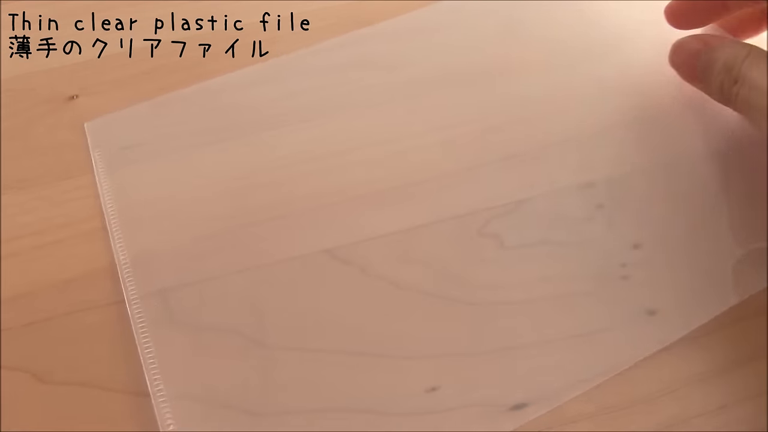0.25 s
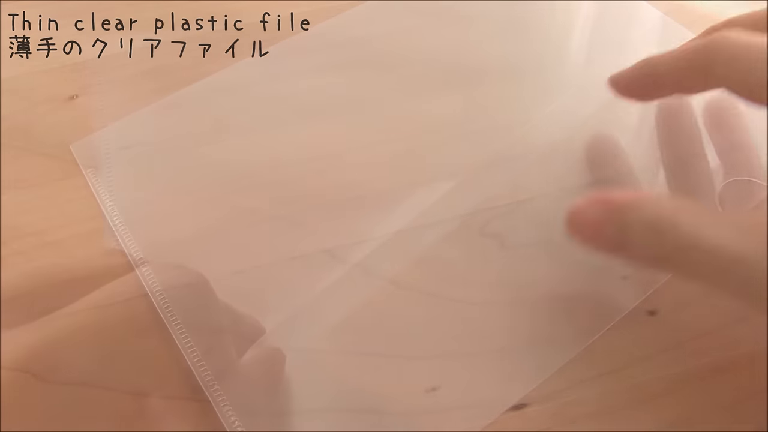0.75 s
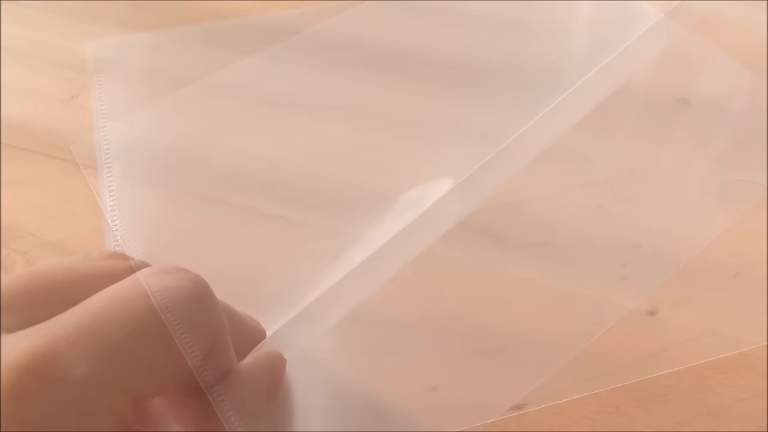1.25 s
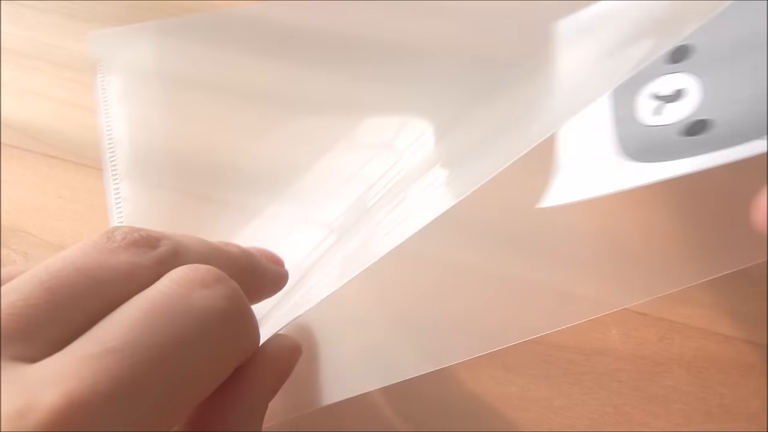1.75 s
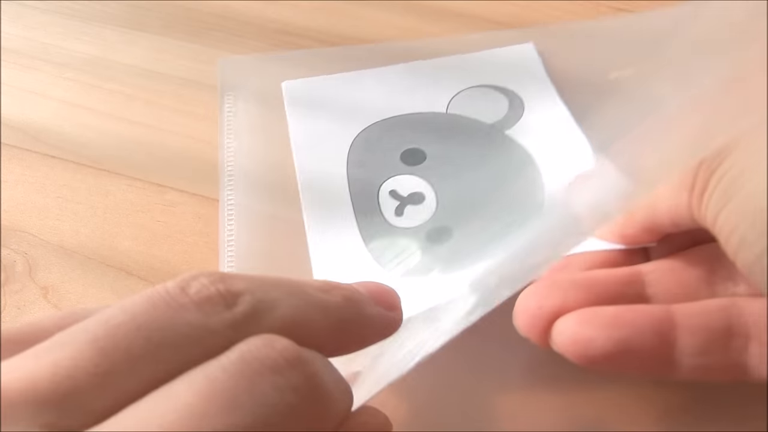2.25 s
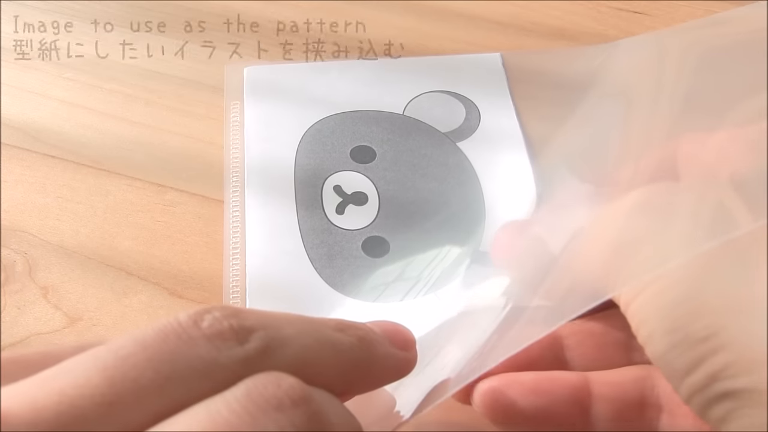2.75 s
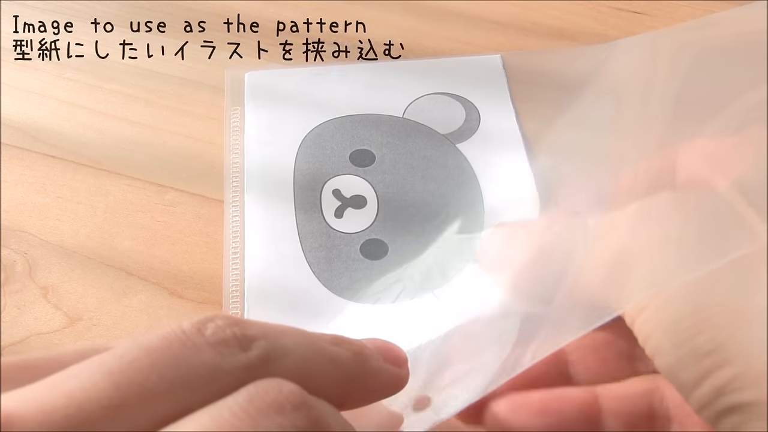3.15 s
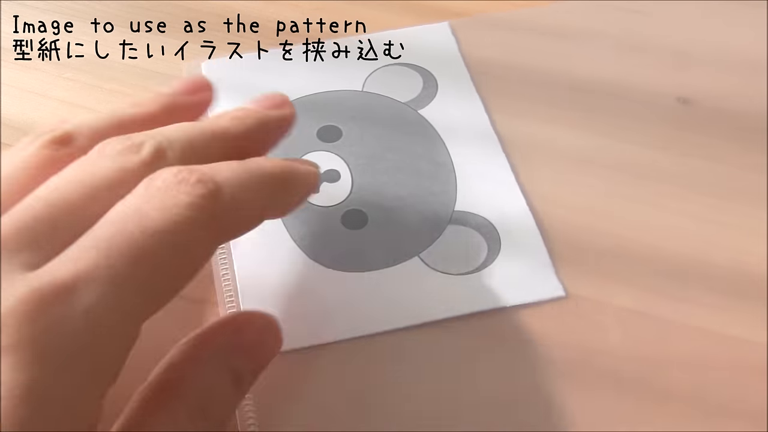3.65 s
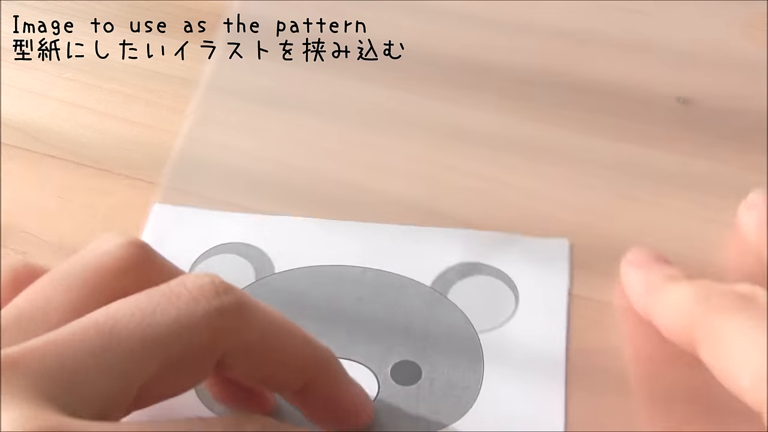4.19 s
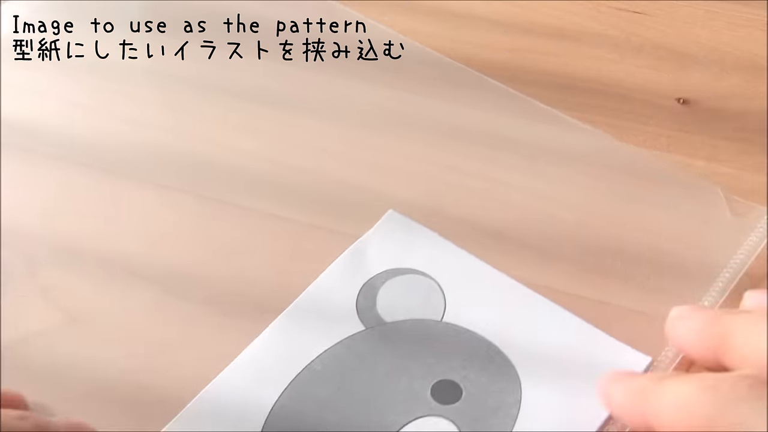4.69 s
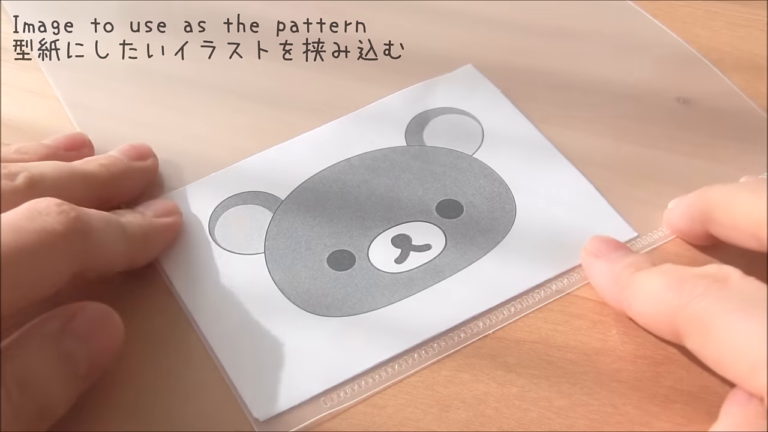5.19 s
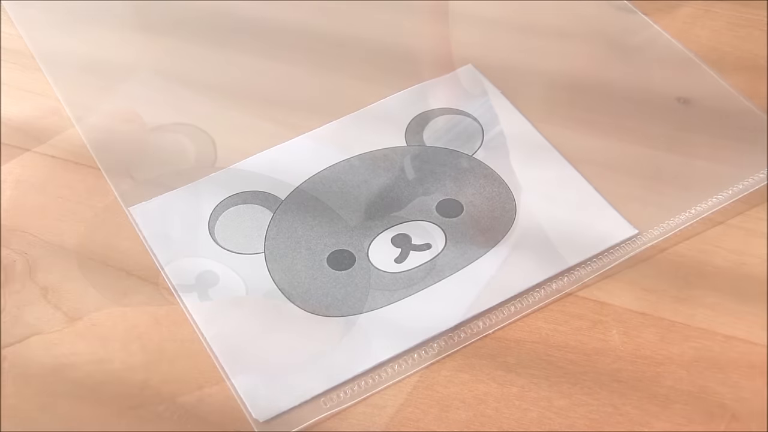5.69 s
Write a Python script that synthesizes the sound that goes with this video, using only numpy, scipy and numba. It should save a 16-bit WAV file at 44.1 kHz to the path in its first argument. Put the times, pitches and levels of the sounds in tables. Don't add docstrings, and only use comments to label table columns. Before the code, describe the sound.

Close, dry stereo sound in a small quiet room, with soft air noise and low handling rumble whose level steps between scenes. In the first 0.1 s thin plastic crackles in quick ticks and small flexes; a faint touch comes at 0.5 and sharp dry ticks at 0.6 and 0.73. Then near quiet, with a small tick at 1.45. From about 1.75 a paper sheet slides in: gritty bright hiss with a ringing, airy colour, a rapid stuttering chatter at 1.92-1.99, and a stronger push near 2.05. At 2.33 the film buckles in a hard snap with a table knock, another at 2.41; weaker sliding follows to 2.9. The loudest double snap comes at 3.24-3.26, with crackle dying away. At 3.53 the cover drops with a small pop and hollow airy ring. From 3.9 to 5.3 the folder turns with softer hissing rubs, a dull knock at 4.21, and fine ticks, fading into faint handling.

```python
import sys
import numpy as np
from scipy import signal
from scipy.io import wavfile
from scipy.ndimage import uniform_filter1d
from numba import njit

SR = 44100
rng = np.random.default_rng(int(sys.argv[2]) if len(sys.argv) > 2 else 0)


def undo_db(level):
    steps = np.asarray(level, float) / 20
    return 10 ** steps


def file_out(sig):
    cols = np.atleast_2d(sig).T
    lim = np.clip(cols, -1, 1)
    pcm = np.round(lim * 32767).astype(np.int16)
    wavfile.write(sys.argv[1], SR, pcm)


N = 261503
EDGES_HZ = 22 * 2 ** np.arange(0, 9.6, .5)
SNAP_PAN_DB = -3
# (time [s], peak level [dB])
CATCHES = [
    (1.921, -38),
    (1.928, -25.5),
    (1.9485, -22),
    (1.960, -31),
    (1.978, -24),
    (1.9823, -29),
    (1.987, -35),
]
CATCH_PAN_DB = -5


def rms_one(x):
    return x / np.sqrt(np.mean(x ** 2) + 1e-20)


def in_time(tables):
    rows = np.concatenate(tables)
    s, *columns = rows[np.argsort(rows[:, 0])].T
    return [np.interp(np.arange(N) / SR, s, c) for c in columns]


def at_hz(points, hz):
    points = np.array(points)
    return np.interp(np.log(hz), np.log(points[:, 0]), points[:, 1])


def by_take(rows):
    s, *columns = np.transpose(rows)
    take = np.searchsorted(s, np.arange(N) / SR, side="right") - 1
    return [uniform_filter1d(c[np.maximum(take, 0)], size=SR // 40) for c in columns]


def strokes(rows):
    s, rise, hold, fall, db = np.abs(np.transpose(rows))[:, :, None]
    t = np.arange(0, N + 32, 32) / SR
    before = np.maximum(s - t, 0) / (rise + 1e-3)
    after = np.maximum(t - s - hold, 0) / (fall + 1e-3)
    power = np.sum(undo_db(-db - 20 * (before + after)) ** 2, axis=0)
    return np.interp(np.arange(N) / SR, t, power)


def band(x, low_hz, high_hz):
    return signal.sosfilt(signal.butter(2, [low_hz, high_hz], "band", fs=SR, output="sos"), x)


def drift(rate):
    r = np.exp(-80 * np.pi * rate / SR)
    slow = signal.lfilter([1], [1, -2 * r, r * r], rng.standard_normal(N // 40 + 2002))[2000:]
    return np.interp(np.arange(N) / 40, np.arange(len(slow)), rms_one(slow))


def grit(per_s, spread_db, alike):
    sizes = undo_db(spread_db * np.minimum(rng.exponential(1, (2, N)), 5)) * rng.standard_normal((2, N))
    mid, side = sizes * (rng.random((2, N)) < per_s / SR)
    alike = np.clip(alike, 0, 1)
    return np.sqrt(1 + alike) * mid + np.sqrt(1 - alike) * side * [[1], [-1]]


def colour(sources, spectrum, patchy_db, rate):
    out = 0
    for k, (low, high) in enumerate(zip(EDGES_HZ, EDGES_HZ[1:])):
        hz = np.sqrt(low * high)
        if spectrum[0][0] <= hz <= spectrum[-1][0]:
            gain = undo_db(at_hz(spectrum, hz) + patchy_db * drift(rate))
            out = out + gain * band(sources[k % 2], low, high)
    return rms_one(out)


def add(out, s, sound, pan_db):
    i = round(s * SR)
    sound = sound[..., :N - i]
    out[:, i:i + sound.shape[-1]] += sound * undo_db([[pan_db / 2], [-pan_db / 2]])


def burst(hz, t60, rise_s, phase):
    t = np.arange(SR // 4) / SR
    swell = 1 - np.exp(-(t / rise_s) ** 2)
    return swell * undo_db(-60 * t / t60) * np.sin(2 * np.pi * hz * t + phase)


def swing(hz, length_s, phase):
    t = np.arange(SR // 4) / SR
    swell = 1 - np.exp(-(t / (.12 * length_s)) ** 2)
    return swell * undo_db(-60 * (t / length_s) ** 1.6) * np.sin(2 * np.pi * hz * t + phase)


@njit
def moving_ring(x, hz, width_hz, sr):
    y = np.zeros_like(x)
    r = np.exp(-np.pi * width_hz / sr)
    for c in range(x.shape[0]):
        for i in range(2, x.shape[1]):
            feedback = 2 * r * np.cos(2 * np.pi * hz[i] / sr) * y[c, i - 1] - r * r * y[c, i - 2]
            y[c, i] = x[c, i] - x[c, i - 2] + feedback
    return y


def room_tone():
    # (start [s], room tone [dB], handling rumble [dB])
    take_levels = [(0, -57, -64), (.13, -65, -72), (.48, -59.5, -69.5), (1.85, -60, -66.5),
                   (2.6, -61, -71.5), (3.37, -64, -70), (3.58, -69, -77.5), (4.3, -66.5, -74.5),
                   (5.665, -59.5, -69)]
    # (frequency [Hz], density [dB per Hz])
    air_spectrum = [(88, -54), (150, -18), (213, -2.5), (291, -6), (587, -8), (647, -10.5), (2170, -14),
                    (3960, -19.5), (13500, -33), (15800, -32)]
    # (frequency [Hz], density [dB per Hz])
    rumble_spectrum = [(22, -21), (50, -8.5), (80, -18.5), (110, -0.5), (150, -7), (220, -32)]
    tone_db, rumble_db = by_take(take_levels)
    mid, side = rng.standard_normal((2, 2, N))
    wide = [m + s * [[.65], [-.65]] for m, s in zip(mid, side)]
    close = [m + s * [[.36], [-.36]] for m, s in zip(side, mid)]
    air = colour(wide, air_spectrum, patchy_db=1.34, rate=20) * undo_db(tone_db + 5.0)
    rumble = colour(close, rumble_spectrum, patchy_db=4.5, rate=6.0) * undo_db(rumble_db + 1.3)
    return air + rumble


def echoes(x):
    # (frequency [Hz], t60 [s])
    echo_t60 = [(200, 0.27), (1000, 0.3), (3000, 0.36), (10000, 0.12)]
    # (frequency [Hz], level [dB])
    echo_level = [(200, 5.5), (1000, -2), (3000, -8.5), (10000, 5)]
    t, tail = np.arange(SR // 2) / SR, 0
    shared, own = rng.standard_normal(len(t)), rng.standard_normal((2, len(t)))
    for low, high in zip(EDGES_HZ[5::2], EDGES_HZ[7::2]):
        hz = np.sqrt(low * high)
        decay = undo_db(at_hz(echo_level, hz) - 60 * t / at_hz(echo_t60, hz))
        tail = tail + band(0.76 * shared + own, low, high) * decay
    tail = tail * np.clip(t / 0.001, 0, 1)
    return signal.fftconvolve(x.mean(axis=0)[None], tail, axes=1)[:, :N]


def settle():
    # (frequency [Hz], level [dB], t60 [s])
    pocket_modes = [(775, -14, .3), (960, -7, 0.43), (1034, -2, .14), (1470, -6.5, .18)]
    # (time [s], level [dB])
    touches = [
        (3.538, -42.5),
        (.5, -54),
    ]
    out, t = np.zeros((2, N)), np.arange(SR // 2) / SR
    for s, db in touches:
        for hz, level_db, t60 in pocket_modes:
            ring = rms_one(band(rng.standard_normal(len(t)), .955 * hz, 1.045 * hz))
            add(out, s, undo_db(db + level_db - 60 * t / t60) * ring, -3.0)
    return out


def knocks():
    # (time [s], peak level [dB], pitch best excited [Hz])
    touches = [(0.044, -46, 223), (0.227, -51, 437), (.277, -54, 437), (0.491, -48.5, 463),
               (0.756, -43, 225), (1.599, -61, 135), (2.068, -51, 270), (2.337, -25, 410),
               (2.345, -37, 355), (2.385, -38, 260), (3.256, -40, 302), (3.475, -53, 132),
               (4.001, -48, 236), (4.212, -35.5, 223), (4.569, -61, 234), (5.058, -60, 124)]
    # (frequency [Hz], level [dB], t60 [s])
    table_modes = [(100, -7, 0.16), (135, -2.5, 0.25), (187.4, -5.5, 0.22), (223, -2.5, 0.18),
                   (260, -4.5, .14), (317.5, -7.5, 0.17), (352, -4, 0.1), (567, -12.5, 0.17),
                   (770, -8, .12), (990, 1.5, 0.071)]
    out = np.zeros((2, N))
    for (s, db, best_hz), phases in zip(touches, rng.random((len(touches), len(table_modes)))):
        ring = 0
        for (hz, level_db, t60), p in zip(table_modes, phases):
            octaves = np.log2(hz / best_hz)
            gain = undo_db(level_db - 9.0 * abs(octaves) - 6.4 * max(-octaves, 0))
            ring = ring + gain * burst(hz, t60, 0.0014, 6 * p)
        add(out, s, undo_db(db) * ring / np.abs(ring).max(), -.8)
    return out


def after_crackle():
    # (time [s], level [dB], lowest [Hz], highest [Hz], t60 [s])
    crackles = [(3.238, -42, 900, 2200, .1), (3.26, -38, 1600, 3000, .3), (3.262, -40, 800, 1410, .4),
                (3.54, -52, 1050, 1800, .2), (2.334, -32, 1296, 2778, 0.044), (2.342, -34, 700, 1700, 0.12)]
    out, slips, t = np.zeros((2, N)), grit(1800, 2.0, 0.71), np.arange(SR // 2) / SR
    for s, db, low_hz, high_hz, t60 in crackles:
        i = round(s * SR)
        once = band(slips[:, i:i + len(t)], low_hz, high_hz)
        crackle = rms_one(band(once, low_hz, high_hz))
        add(out, s, undo_db(db - 60 * t / t60) * crackle, SNAP_PAN_DB)
    return out


def ticks():
    # (time [s], peak level [dB], pitch [Hz], left-right [dB])
    dry_ticks = [(0.0417, -34, 3130, 4), (0.092, -31.5, 3570, 4), (0.6178, -30.5, 5100, -8),
                 (0.655, -49, 3800, -1.5), (0.7347, -21.5, 6470, 6), (0.7431, -27.5, 5900, 2),
                 (1.8224, -37.5, 4270, -21.5), (2.2232, -30, 3140, -1), (2.27, -33, 5550, -12),
                 (2.299, -30.5, 4400, -5), (2.3244, -45, 3100, -3), (3.2417, -43, 4520, -9),
                 (3.3182, -35, 4500, -2), (3.7991, -40, 10500, 1.5), (0.7345, -32, 2600, 6),
                 (3.799, -33, 4070, 1.5), (3.817, -37, 4030, 0.5), (3.863, -38, 5540, -1.0),
                 (4.211, -41.5, 1800, 2), (4.7772, -39.5, 4400, -2), (1.736, -38, 4000, -2),
                 (1.774, -41, 4500, -2), (1.8, -41, 1400, 2), (1.82, -37, 1700, -4), (5.093, -48, 4300, -1),
                 (4.604, -42, 4300, 1), (4.658, -43, 4500, -3), (4.522, -43, 4200, 1),
                 (5.489, -42, 3840, -1.0)]
    # (time [s], peak level [dB], pitch [Hz], left-right [dB], t60 [s])
    odd_ticks = [(.0250, -25, 8000, 9, 0.0062), (0.0512, -20.5, 2500, 5, 0.0027),
                 (0.0512, -26, 8500, 2, 0.0032), (0.6063, -38.5, 7800, -6, .006),
                 (3.2359, -28, 5970, -10, .004), (0.49, -46, 1700, -1, .02),
                 (1.448, -44.5, 3000, -2, 0.014), (1.888, -35, 7000, 2, .008),
                 (4.4488, -29, 5330, 4, 0.0018), (4.9144, -26, 5100, 1, .002), (4.995, -37, 4190, -1, .003)]
    out, t = np.zeros((2, N)), np.arange(900) / SR
    rows = [(*r, 0.0065) for r in dry_ticks] + odd_ticks
    rows += [(s, db - 5.0, 2700, CATCH_PAN_DB, 0.0089) for s, db in CATCHES]
    for (s, db, hz, pan, t60), white in zip(rows, rng.standard_normal((len(rows), 900))):
        spray = white * undo_db(-60 * t / max(t60, .001))
        crack = band(3.4 * (t == 0) + spray, 0.55 * hz, min(1.57 * hz, 15500))
        add(out, s, undo_db(db) * crack / np.abs(crack).max(), pan)
    return out


def chatter():
    # (frequency [Hz], level [dB], t60 [s])
    edge_modes = [(1180, -3, 0.01), (2620, 0, 0.0096), (3850, 0, 0.0065)]
    out = np.zeros((2, N))
    for (s, db), u in zip(CATCHES, rng.random((len(CATCHES), 6))):
        ring = 0
        for k, (hz, level_db, t60) in enumerate(edge_modes):
            ring = ring + undo_db(level_db + 4.0 * u[k]) * swing(hz, t60, 6 * u[k + 3])
        add(out, s, undo_db(db - 9.0) * ring, CATCH_PAN_DB)
    return out


def snaps():
    # (time [s], peak level [dB], pitch [Hz], t60 [s], overtone [dB])
    main_snaps = [(0.09, -36.5, 543, 0.01, -2), (0.489, -50, 940, 0.023, 2),
                  (2.332, -14, 965, 0.0068, -6.5), (2.345, -27, 793, 0.037, 1.5),
                  (2.35, -31, 994, 0.02, -20), (2.359, -30, 940, 0.017, -11), (2.365, -30, 563, 0.018, -12),
                  (2.382, -33, 745, 0.0065, -3), (2.411, -18.5, 2390, 0.0055, -24),
                  (2.419, -32, 2170, 0.0084, -14), (2.438, -34.5, 2320, 0.013, -14),
                  (3.235, -6.5, 1496, 0.0059, -2.5), (3.2574, -9, 1420, 0.0041, -18)]
    # (time [s], peak level [dB], pitch [Hz], t60 [s], left-right [dB])
    side_snaps = [(0.029, -27, 1280, 0.003, 4), (0.051, -27, 2600, 0.0046, 4),
                  (0.06, -31.5, 724, 0.0056, 3), (1.448, -40.5, 870, 0.0029, 16.5),
                  (1.736, -42, 2900, 0.0075, -6), (1.799, -45, 585, 0.029, -4),
                  (1.886, -32, 3190, 0.015, 12.5), (2.336, -19.5, 610, 0.011, -11),
                  (3.336, -29, 1200, 0.0074, -5), (3.355, -36, 810, 0.0085, -5)]
    # (time [s], peak level [dB], pitch [Hz], t60 [s], left-right [dB])
    tight_snaps = [(0.027, -39, 3500, 0.0063, 10.5), (2.2704, -41.5, 3180, 0.01, -5),
                   (2.4117, -16, 3460, 0.0039, -2.5), (3.2578, -18, 2440, .0045, -1.5),
                   (2.3375, -25.5, 2300, 0.0034, -1), (3.534, -25.5, 985, 0.0078, -7),
                   (3.536, -30.5, 1450, 0.0072, -6), (4.211, -45, 1093, 0.022, 8),
                   (0.032, -36, 1400, 0.011, 1)]
    out, t = np.zeros((2, N)), np.arange(SR // 4) / SR
    rows = [(*r, SNAP_PAN_DB) for r in main_snaps]
    rows += [(*r[:4], -5, r[4]) for r in side_snaps]
    rows += [(*r[:4], -24, r[4]) for r in tight_snaps]
    phases, noises = rng.random((len(rows), 2)), rng.standard_normal((len(rows), SR // 4))
    for (s, db, hz, t60, over_db, pan), u, white in zip(rows, phases, noises):
        t60 = max(t60, .002)
        ring = swing(hz, t60, 6 * u[0]) + undo_db(over_db) * swing(1.917 * hz, 0.6 * t60, 6 * u[1])
        crack = band(white * undo_db(-60 * t / 0.021), 0.33 * hz, 5800) * undo_db(-20)
        uneven = 2.26 * white * np.abs(white)
        small = uneven * np.clip(t / 0.002, 0, 1) * undo_db(-60 * t / 0.4)
        chase = band(small, 0.53 * hz, 1.54 * hz) * undo_db(-36.0)
        add(out, s, undo_db(db) * (ring / np.abs(ring).max() + crack + chase), pan)
    return band(out, 224, 7800)


def sliding():
    # (time at full strength [s], rise [s per 20 dB], hold [s], fall [s per 20 dB], level [dB]) fingers
    film_rubs = [(0, .01, 0.0018, 0.01, -52), (.034, -0.7, 0.019, 0, -52), (.234, 0.3, .002, 0, -64.5),
                 (.38, -0.2, .02, -0.7, -69), (.495, -0.6, .002, 0, -66.5), (.61, -1, .09, 12, -68.5),
                 (.755, -0.54, .002, 0.3, -59), (.78, -3, .07, 4.5, -74), (1.455, 0.15, .002, 3, -64.5),
                 (3.215, 0.27, 0.03, 0.03, -57.5), (3.31, 0, 0.015, -0.1, -61),
                 (3.453, 0.1, 0.063, 0.1, -59), (3.515, 0.06, 0.015, 0.008, -49.5),
                 (3.79, -0.5, .002, -4, -72), (5.5, 0.5, .002, -2, -69), (5.67, -0.1, .26, 4, -65),
                 (1.83, .55, .002, .1, -70),
        (1.87, 0.093, 0.42, 0.3, -54),
        (2.043, 0.13, .002, 0.12, -47.5),
        (2.33, 0.9, 0.24, 0.063, -49),
        (2.626, .1, 0.26, 0.33, -66.5),
        (2.747, 0.13, 0.018, .1, -63.5),
        (2.837, 0.18, .002, 0.06, -57.5),
    ]
    table_rubs = [
        (3.9, .3, 0.13, 0.44, -69),
        (4.164, 0.54, 0.041, 0.072, -58),
        (4.29, 0.16, 0.14, 0.21, -58),
        (4.55, 0.11, 0.11, 0.2, -62.5),
        (4.818, 0.045, 0.28, 0.14, -59.5),
        (4.9, 0.18, .002, 0.37, -57),
    ]
    glides = [(0, .01, .012, 0.037, -41), (.058, .01, .004, 0.0091, -48), (.234, 0.016, .002, 0.14, -52.5),
              (1.83, 0.23, .002, .1, -54.5), (1.92, 0.11, 0.065, 0.056, -37),
              (2.04, 0.048, 0.029, 0.17, -39.5), (2.32, 0.67, .002, 0.042, -48),
              (2.404, 0.064, .002, 0.022, -41), (2.54, 0.14, 0.039, 0.074, -46.5),
              (2.745, .1, 0.023, 0.093, -52.5), (2.82, 0.057, .025, .06, -50.5),
              (3.225, 0.048, .002, 0.06, -45.5), (3.475, 0.022, 0.015, 0.08, -44),
              (3.518, .03, 0.0062, 0.011, -48), (3.79, 0.16, .002, .16, -64),
              (3.89, 0.067, 0.094, 0.18, -57), (4.2, .05, .002, .055, -64), (4.3, 0.089, .05, .1, -56),
              (4.385, 0.15, .01, 0.25, -48.5), (4.5, 0.23, 0.017, 0.03, -47.5),
              (4.59, 0.026, 0.067, 0.11, -50.5), (4.818, .03, 0.1, 0.29, -46.5), (5.0, .2, .02, 0.15, -50),
              (5.095, .1, 0.0089, 0.12, -48.5)]
    bends = [(0, .01, 0.0022, .05, -39.5), (.034, 0.0092, .002, 0.044, -40),
             (.055, 0.012, 0.00066, 0.0044, -30.5), (.066, .01, .002, 0.32, -54.5),
             (.234, 0.024, .002, 0.12, -49), (.398, 0.033, .002, 0.092, -59.5),
             (.495, .01, .002, 0.097, -55), (.755, .05, .002, 0.26, -61), (1.455, 0.018, .002, 0.097, -52),
             (1.829, 0.3, 0.0026, 0.037, -49), (1.92, 0.094, 0.055, 0.053, -40.5),
             (2.04, .05, 0.025, 0.13, -41), (2.16, .1, 0.15, .1, -52.5), (2.35, 0.04, .002, 0.089, -34.5),
             (2.6, 0.11, .002, 0.036, -52), (2.62, .05, 0.37, 0.53, -59.5), (2.832, 0.21, .002, 0.079, -51),
             (3.265, 0.082, .002, .012, -42.5), (3.343, 0.16, .002, 0.1, -43),
             (3.45, 0.0069, 0.059, .04, -46.5), (3.528, 0.089, .002, 0.041, -41.5),
             (4.906, 0.33, .002, 0.5, -59), (5.67, .02, .26, .1, -65)]
    # (time [s], pitch [Hz], upper mode [ratio], upper mode level [dB])
    gap_pitch = [(0, 3200, 1.25, -4), (.75, 3720, 1.25, -1), (1.8, 3240, 1.25, 1), (1.89, 3270, 1.25, -4),
                 (1.95, 2640, 1.45, -1), (1.99, 2680, 1.45, -3), (2.06, 3250, 1.3, -3.5),
                 (2.13, 3220, 1.3, -4), (2.32, 3640, 1.25, 0), (2.5, 2930, 1.25, -1.5),
                 (2.83, 3570, 1.25, 0.5), (3.22, 3680, 1.25, 1), (3.3, 2700, 1.25, 4),
                 (3.5, 3370, 1.25, -0.5)]
    # (time [s], pitch [Hz], upper mode [ratio], upper mode level [dB])
    turn_pitch = [(3.88, 3870, 1.25, -10), (4.05, 3400, 1.25, -12), (4.3, 4500, 1.17, -2),
                  (4.36, 4280, 1.25, 0), (4.39, 4270, 1.4, 6.5), (4.41, 4400, 1.3, -6),
                  (4.47, 4000, 1.3, -11), (4.5, 3850, 1.3, -10), (4.53, 4350, 1.2, -12),
                  (4.6, 4300, 1.2, -4), (4.7, 4300, 1.2, -3), (4.82, 4350, 1.17, -3.5),
                  (4.92, 4500, 1.17, -2.5), (5.02, 4240, 1.17, -2.5), (5.2, 4200, 1.2, -15),
                  (5.93, 3400, 1.25, 6)]
    # (frequency [Hz], density [dB per Hz])
    hiss_spectrum = [(880, -11.5), (1500, -11.5), (1980, -13), (3020, -12), (5510, -6), (8250, -11),
                     (12500, -10), (15800, -31.5)]
    # (frequency [Hz], density [dB per Hz])
    flex_spectrum = [(250, -12), (500, -13.5), (900, -7.5), (1500, -7.5), (2300, -8.5), (3500, -17.5)]
    idle_db, gap_share_db, bend_share_db = -85.5, -15, -12
    handled = strokes(film_rubs) + undo_db(2 * idle_db)
    rub = handled + strokes(table_rubs)
    hiss_db = 10 * np.log10(rub)
    gap_db = 10 * np.log10(strokes(glides) + undo_db(2 * gap_share_db) * rub)
    flex_db = 10 * np.log10(strokes(bends) + undo_db(2 * bend_share_db) * handled)
    gap_hz, upper, upper_db = in_time([gap_pitch, turn_pitch])
    grip = drift(19.0)

    fine = [grit(9000, 1.2, 0.74), grit(9000, 0.39, 0.64)]
    hiss = colour(fine, hiss_spectrum, patchy_db=-0.7, rate=9.1) * undo_db(hiss_db + 3.5 + 1.32 * grip)

    gap_hz = gap_hz * undo_db(0.25 * drift(26))
    slips = moving_ring(grit(5000, 1.0, 0.91), gap_hz, 3000.0, SR)
    lower_mode = 400 * moving_ring(slips, 0.958 * gap_hz, 430.0, SR)
    upper_mode = 450 * undo_db(upper_db) * moving_ring(slips, 0.95 * upper * gap_hz, 680.0, SR)
    gap = rms_one(band(lower_mode + upper_mode, 2030, 7300)) * undo_db(gap_db - 3.0 + 0.78 * grip)

    coarse = [grit(2500, 1.55, 0.57), grit(2500, 1.7, 0.63)]
    flex = colour(coarse, flex_spectrum, patchy_db=2.5, rate=6.9) * undo_db(flex_db - 3.0 + 0.53 * grip)
    return (hiss + gap + flex) * undo_db([[-.6], [.6]])


def scene():
    hits = snaps() + ticks() + chatter() + knocks()
    reverberant = hits + undo_db(-34) * echoes(hits)
    return reverberant + settle() + after_crackle() + sliding() + room_tone()


def band_limit(x):
    return signal.sosfilt(signal.butter(12, 16430, fs=SR, output="sos"), x)


def record(dry):
    finished = signal.sosfilt(signal.cheby2(14, 70, 16500, fs=SR, output="sos"), dry)
    return band_limit(finished)


dry = scene()
out = record(dry)
file_out(out)
```